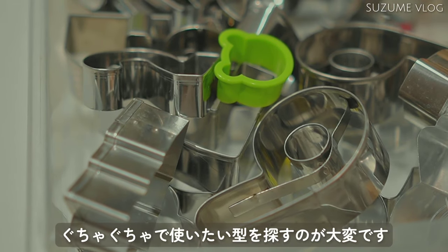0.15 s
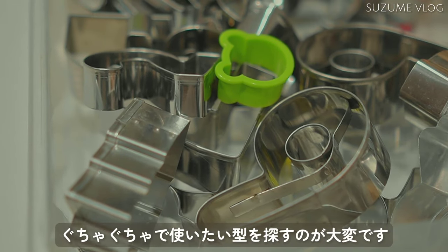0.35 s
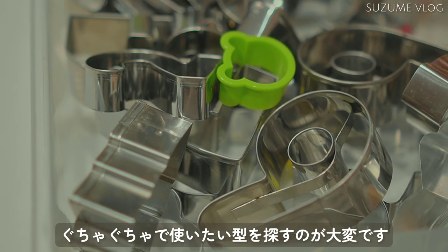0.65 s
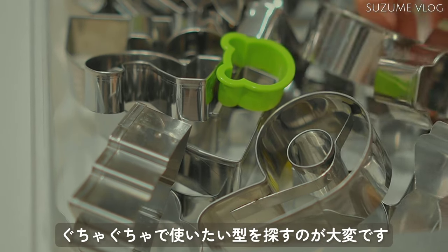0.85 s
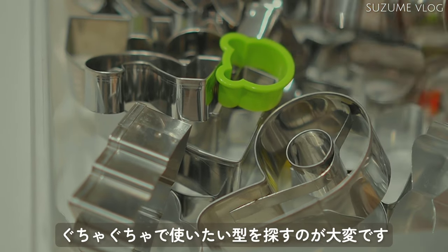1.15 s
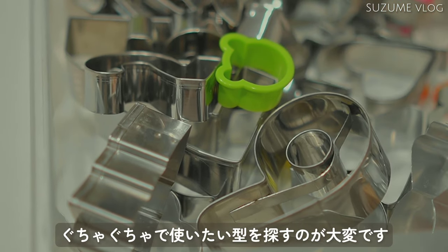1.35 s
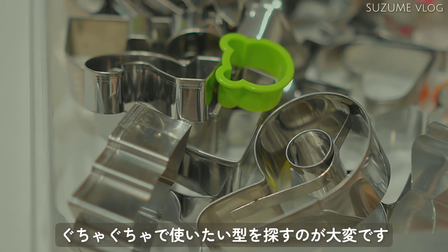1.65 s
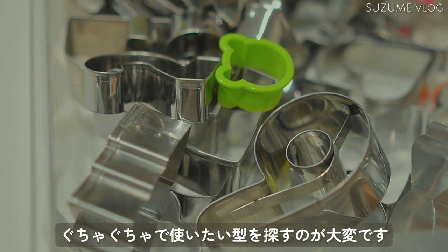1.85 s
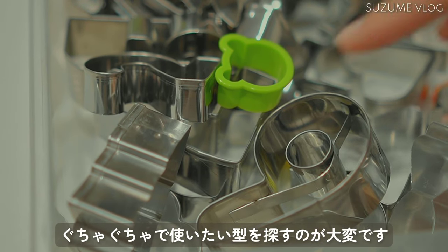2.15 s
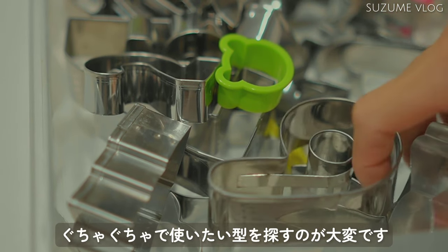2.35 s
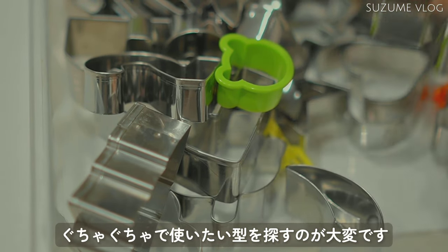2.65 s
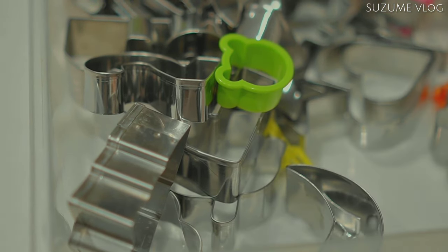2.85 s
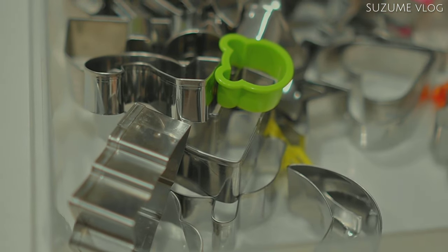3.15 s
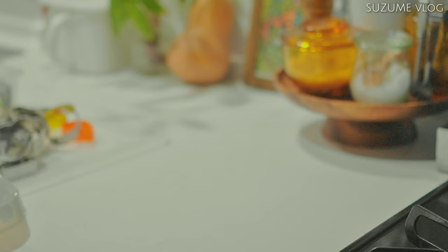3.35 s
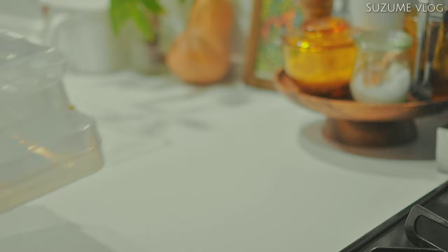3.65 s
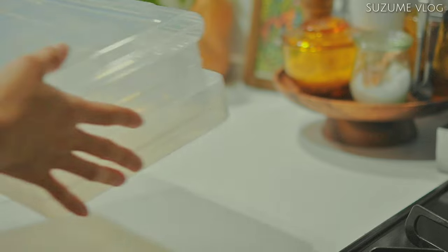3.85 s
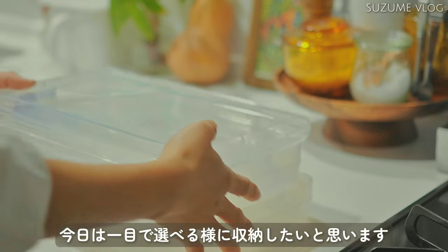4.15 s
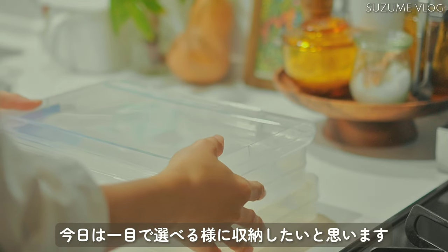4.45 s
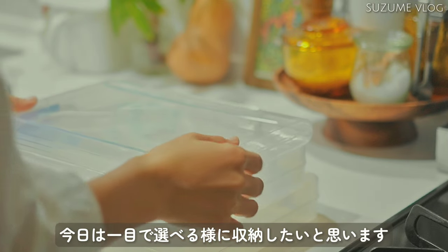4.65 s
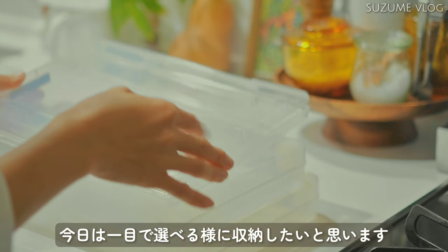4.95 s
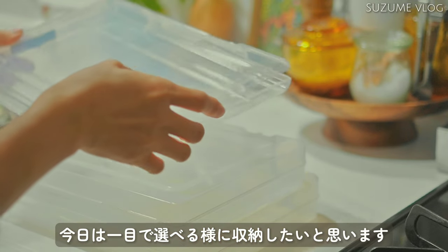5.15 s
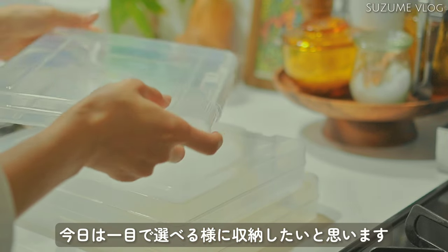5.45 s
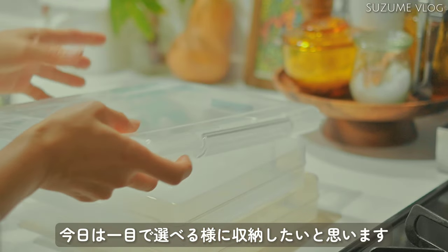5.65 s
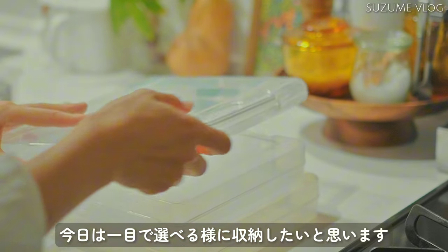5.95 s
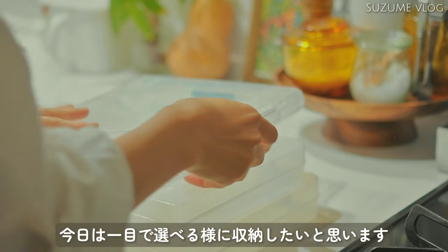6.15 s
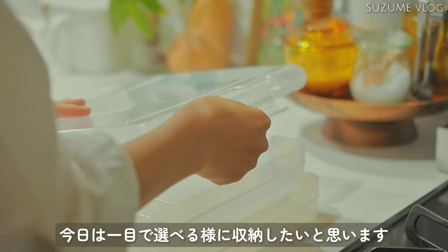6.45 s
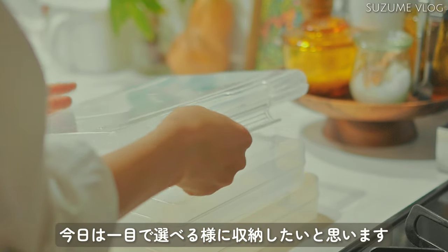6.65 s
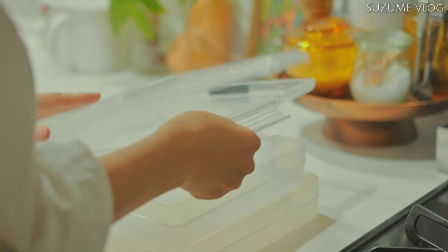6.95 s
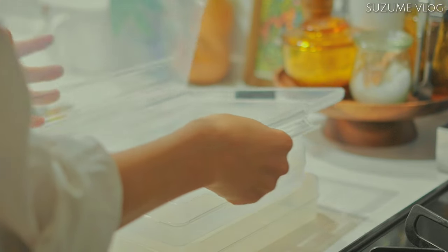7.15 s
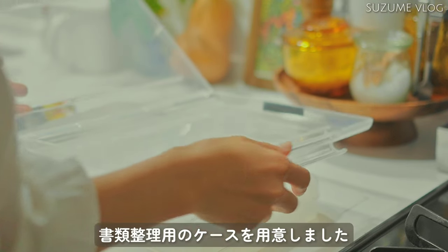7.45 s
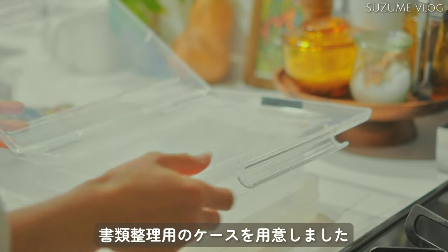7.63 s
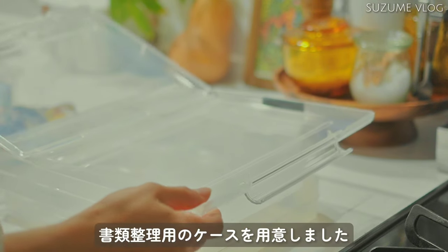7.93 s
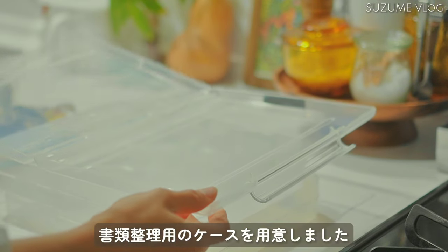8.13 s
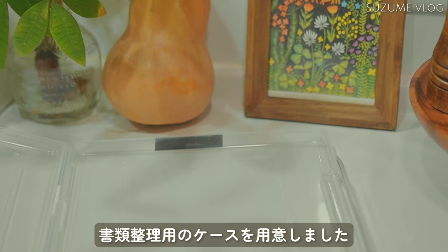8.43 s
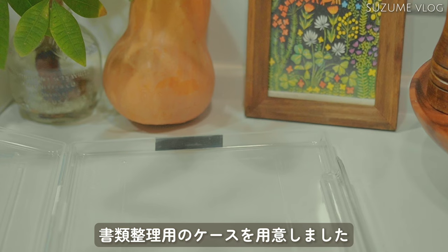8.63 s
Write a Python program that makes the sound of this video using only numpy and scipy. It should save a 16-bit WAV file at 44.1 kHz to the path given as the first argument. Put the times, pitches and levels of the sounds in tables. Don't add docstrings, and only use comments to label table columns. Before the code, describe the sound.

A hand rummages through thin metal cookie cutters in a plastic box: dense, bright clinks, sharp knocks and brief ringing, in three bursts with short lulls. Abruptly the scene changes to flat plastic cases being stacked, lifted, unlatched and opened on a kitchen counter, with dry clacks and soft scrapes. It ends on near-silent room tone. Close stereo microphone, small indoor room, little bass.

```python
import sys
import numpy as np
from scipy import signal
from scipy.fft import rfft, irfft
from scipy.io import wavfile
from scipy.ndimage import uniform_filter1d, minimum_filter1d

SR = 44100
rng = np.random.default_rng(int(sys.argv[2]) if len(sys.argv) > 2 else 0)


def store_pcm(level_fs):
    pcm = np.round(np.clip(level_fs, -1, 1) * 32767).astype(np.int16)
    wavfile.write(sys.argv[1], SR, np.atleast_2d(pcm).T)


def amplitude_ratio(level_db):
    exponent = np.asarray(level_db, float) / 20
    return 10 ** exponent


N = 387618
T = np.arange(N) / SR

CHANGES_S = [
    3.376,
    8.356,
]
HANDFULS_S = [0, .315, .708, 1.505, 2.305, 2.915, 3.38]
# frequency in Hz, level in dB.
WALL_MODES = [
    [(3908, -52)],
    [(2955, -36), (3806, -46), (5572, -21), (7289, -34), (8204, -47), (11983, -49)],
    [(1674, -27), (2433, -24.5), (5825, -28), (9652, -39), (11149, -44)],
    [(4904, -38), (5825, -39), (6842, -28.5), (8495, -54)],
    [(1540, -27), (4102, -26), (4893, -26.5), (10869, -55), (11730, -42)],
    [(5760, -38), (6794, -22), (8215, -25), (9335, -26.5), (12554, -39), (13598, -31)],
]
# frequency in Hz, density in dB per Hz.
STEEL_SPECTRUM = [(710, -35.5), (1200, -22), (1700, -4), (1860, -4.5), (2760, -4), (4620, 1.5),
                  (10400, -7.5), (12400, -6), (15600, -12), (16500, -68)]
# frequency in Hz, density in dB per Hz.
BOX_SPECTRUM = [(59, -67), (100, -39), (171, -40), (248, -55), (301, -15), (745, -9), (1430, 5.5),
                (1870, 3), (3500, -8.5), (4550, -5), (7700, -120)]
# frequency in Hz, density in dB per Hz.
CASE_SPECTRUM = [(410, -28.5), (700, -4), (884, -1), (1120, -0.5), (1720, 1.5), (2290, 2), (4420, -3.5),
                 (6000, -11.5), (7800, -24), (13200, -120)]
# frequency in Hz, density in dB per Hz.
AIR_SPECTRUM = [(15, -99), (25, -62), (197, -20.5), (280, -14.5), (339, -18), (470, -7), (1980, -3),
                (2150, -2.5), (2600, -6), (3320, -7), (5130, -11.5), (15200, -23), (16500, -23)]
AIR_DB = [
    -48,
    -48.5,
    -50,
]
# frequency in Hz, level in dB.
WHINE = [(2169, -67), (3295, -67), (6115, -78), (14804, -78)]
# frequency in Hz, T60 in seconds.
ROOM_T60 = [(150, 0.61), (600, 0.34), (2000, 0.32), (6000, 0.31), (15000, 0.25)]
# frequency in Hz, likeness from 0 to 1.
LIKENESS = [(100, 1), (1000, 0.93), (4000, 0.69), (12000, 0.013)]
# start in seconds, hold in seconds, chatter in dB, box share in dB.
PUSHES = [(0, 0.0057, -19.5, -6), (.323, 0.24, -15.5, -9), (.5, 0.054, -15, -4), (.713, 0.0039, -17, -13.5),
          (.76, 0.093, -15.5, -7.5), (.873, 0.027, -16, -9), (.93, 0.1, -15, -9.5),
          (1.09, 0.056, -17, -9.5), (1.194, 0.028, -18, -1.5), (1.32, 0.072, -27.5, -8),
          (1.525, 0.037, -25.5, -21), (1.565, 0.0052, -29, -29), (1.66, 0.016, -19.5, -26),
          (1.682, 0.11, -16.5, -7), (1.83, 0.041, -16.5, -2.5), (1.91, 0.058, -25, 6),
          (2.33, 0.019, -29, 0.5), (2.382, 0.15, -17, -14), (2.52, 0.097, -17.5, -8),
          (2.71, 0.031, -19.5, -11), (2.78, 0.064, -23, -7.5), (2.923, 0.014, -29, -23),
          (2.947, 0.025, -11.5, -9), (3.044, 0.021, -13, -37), (3.066, 0.055, -14.5, -7.5),
          (3.25, 0.062, -20, -9), (3.36, .03, -13.5, -17.5)]
# time in seconds, peak in dB, low
# ring in Hz, high ring in Hz.
KNOCKS = [(0.1382, -30, 3520, 6470), (0.246, -33, 3330, 7560), (0.321, -4.5, 5110, 7800),
          (0.389, 0, 3800, 11950), (0.4445, -6, 5060, 11600), (0.521, -2, 5650, 9100),
          (0.5596, -5, 5300, 8100), (0.7122, -4.5, 2570, 6470), (0.7606, -8, 4720, 6900),
          (0.7930, -0.5, 5280, 6900), (0.8109, 4, 4920, 11200), (0.839, -3, 4620, 8200),
          (0.8733, 6, 1500, 7540), (0.906, -4.5, 4600, 9100), (0.952, -8.5, 4070, 7340),
          (0.9643, -1.5, 4800, 6760), (1.014, -6, 4780, 10600), (1.0285, 0, 5370, 9200),
          (1.0737, -6, 5140, 7000), (1.1338, -12, 4200, 7300), (1.168, -1, 4540, 9770),
          (1.197, -13, 5940, 11600), (1.2181, -8, 1910, 9700), (1.2443, -12, 1780, 7600),
          (1.287, -12.5, 2230, 6200),
          (1.568, -18, 2490, 8200),
    (1.6142, -23.5, 5600, 9800),
    (1.6825, 0, 2240, 11800),
    (1.7014, -1, 2230, 7360),
    (1.7254, 0, 4980, 9230),
    (1.7602, -6.5, 3900, 7250),
    (1.836, -12, 3940, 8950),
    (1.891, 3, 1340, 7300),
    (1.9058, -9, 4940, 6800),
    (2.0653, -29.5, 2550, 11700),
          (2.3505, -15, 5500, 12000), (2.3753, -7.5, 4000, 6050), (2.383, -5.5, 4270, 8900),
           (2.4374, 2, 4030, 10300), (2.4854, -7, 4030, 6800), (2.537, -7, 4020, 9500),
           (2.597, -4, 4110, 9500), (2.7104, -15, 4030, 8100), (2.7198, -1, 1600, 6620),
           (2.7462, -5, 5940, 12000), (2.849, -5.5, 5270, 7100), (2.9234, -11.5, 5790, 9300),
           (2.9477, -12.5, 2330, 6560), (2.9669, 7, 5550, 6900), (2.9954, -1, 5900, 7400),
           (3.0428, 3, 6780, 13300), (3.068, 7.5, 5750, 6870), (3.0966, 3, 5800, 9500),
           (3.1486, -14, 7110, 8300), (3.2521, -9, 6440, 8360), (3.3032, -7.5, 3760, 11200),
           (3.338, -9, 5470, 8200), (3.3553, -10.5, 6500, 9200)]
# time in seconds, peak in dB.
TAPS = [(0.323, 2), (0.335, -0.5), (0.355, -9), (0.402, 7), (0.42, -3), (0.4518, -2), (0.471, -1),
        (0.5035, 2), (0.5418, -12), (0.5957, -8.5), (0.7214, -14), (0.7665, -1), (0.7784, -11),
        (0.8228, -4), (0.832, -1), (0.843, -11), (0.929, -2), (0.9745, 2.5), (1.038, -11), (1.1935, 7),
        (1.21, -4), (1.4104, -40), (1.5776, -24), (1.6672, -22), (1.8411, 4), (1.8459, 4.5), (1.875, 4.5),
        (1.9994, -13.5), (2.0695, -14), (2.356, -14.5), (2.3905, 5), (2.443, 0), (2.4507, 6.5), (2.548, -4),
        (2.5696, -8), (2.582, -12), (2.729, -20), (2.7748, -10), (2.8694, -10), (2.9277, -15), (2.955, -14),
        (3.0785, -1), (3.102, -4), (3.125, 1.5), (3.36, -5), (3.3687, -18)]
# time in seconds, peak in dB.
JOLTS = [
    (0.526, -49.5),
    (1.002, -55),
    (1.92, -55),
    (3.063, -49),
]
# start in seconds, frequency in Hz, level in dB, length in
# seconds (sign ignored, a quarter of it is held).
SINGING_PARTIALS = [(0.325, 7430, -21, 0.078), (0.341, 3790, -18, 0.037), (0.348, 11090, -30, 0.014),
                    (0.353, 12000, -20, 0.026), (0.356, 6680, -17, 0.085), (0.357, 2345, -17.5, 0.031),
                    (0.358, 4920, -13, 0.04), (0.386, 12230, -6.5, 0.037), (0.428, 6570, -18, 0.06),
                    (0.461, 7320, -16, 0.13), (0.527, 5580, -14, 0.14), (0.54, 7300, -26, 0.029),
                    (0.55, 2975, -19, 0.1), (0.556, 8500, -33, -0.00052), (0.569, 2493, -12.5, 0.0092),
                    (0.76, 13260, -27, 0.027), (0.83, 4600, -19, 0.03), (0.8733, 7750, -5, 0.004),
                    (0.515, 1240, -14.5, 0.072), (1.218, 1720, -10, 0.012), (1.241, 1495, -16, 0.011),
                    (0.907, 8830, -21, 0.015), (1.167, 13000, -24, 0.02), (1.168, 4550, -12, -0.011),
                    (1.189, 5810, -10, 0.029), (1.192, 14500, -27, -0.006), (1.194, 11080, -6, 0.019),
                    (1.709, 3850, -19, 0.027), (1.722, 8970, -15, 0.013), (1.756, 13570, -12, 0.011),
                (1.833, 10260, -13, 0.01), (1.834, 14970, -11, 0.015), (1.835, 8530, -9, 0.019),
                (1.85, 5840, -12, 0.054), (1.874, 8600, -28, 0.0038), (1.9, 14500, -24, 0.016),
                (1.903, 4950, -7, -0.00068), (1.908, 8620, -19.5, 0.077), (2.535, 10870, -21, 0.045),
                (2.536, 4101, -9, 0.028), (2.532, 9390, -16, 0.036), (2.554, 1537, -16.5, 0.0061),
                (2.622, 3900, -19, 0.01), (2.712, 3930, -9, 0.0011), (2.716, 4910, -4, -0.0018),
                (2.748, 11850, -12.5, 0.015), (2.923, 4970, -21, 0.018), (2.924, 5800, -6, 0.021),
                (2.929, 9320, -19, 0.018), (2.924, 10100, -19, 0.019), (2.925, 8420, -19, 0.026),
                (2.98, 3400, -14, 0.036), (2.993, 5760, -1, 0.014), (2.994, 1670, -27, 0.018),
                (2.987, 6980, -6, 0.016), (3.042, 8230, -23, 0.024), (3.042, 13590, -3, 0.011),
                (3.055, 5650, -18, 0.031), (3.056, 9320, -28, 0.064), (3.064, 12600, -5, 0.039),
                (3.065, 6860, -21, 0.032), (3.119, 14500, -8, 0.02), (3.147, 7110, -17, 0.023),
                    (3.3, 2317, -22, .2),
    (3.337, 5350, -14, .015),
    (3.36, 8500, -10, 0.019),
]
# start in seconds, frequency in Hz, level in dB, length in seconds (a
RINGER = [
    (2.9235, 4101, -11, .05),
    (2.95, 4101, -21, .15),
    (3.0432, 4101, -6, .06),
    (3.068, 4101, -7, .03),
    (3.097, 4101, -6, .07),
    (3.13, 4101, -19, .1),
    (3.17, 4101, -21, .32),
]
# time in seconds, depth in dB.
HUSHES = [(.793, -19), (0.874, -10), (2.7215, -13), (.965, -9), (2.4375, -6), (2.537, -3), (1.168, -1),
          (1.7244, -2), (1.891, 2), (2.9473, -15), (2.968, -7), (3.044, -8), (3.07, -4)]
# time in
# seconds, peak in dB, panel in Hz, body in dB, brightness in dB.
CASE_KNOCKS = [(3.483, -38, 2100, -20, 1), (4.132, -41, 1160, -26, 6), (4.2036, -7, 3430, -18.5, -7),
               (4.353, -26, 1550, -9, -2), (4.676, -31, 1790, -7.5, -26), (4.856, -30, 1300, -34, -31),
               (4.885, -33, 1720, -5, -24), (4.939, -19.5, 1045, -10, -8), (5.196, -41, 700, 1.5, -20),
               (5.3914, -15.5, 2360, -39, 1.5), (5.396, -12, 4540, -33, -12), (5.4605, -8, 1920, -48, -28),
               (5.473, -19.5, 1410, -22, -20), (5.647, 0, 1610, -21.5, -8.5), (5.65, -7.5, 1690, -15.5, -26),
               (5.659, -22, 1600, -24, -22), (5.805, -16.5, 1500, -20, -3), (5.811, -17, 1280, -13, -5),
               (5.85, -24, 1770, -21, -15), (5.878, -14.5, 1800, -16, -3.5), (5.972, -26.5, 1280, -26, -5),
               (5.993, -30, 1010, -20, -11), (6.018, -34, 1350, -11, -12), (6.05, -35, 845, -5, -11),
               (6.232, -38, 1590, -3, -23),
               (6.338, -27, 995, -37, 8.5), (6.399, -35, 875, -13, -26), (6.49, -20.5, 1040, -20, -7),
           (6.513, -16, 1590, -28, -5), (6.606, -24, 1800, -31, -7), (6.694, -17, 1420, -16, -12),
           (6.699, -17.5, 2160, -17, -21), (6.706, -26.5, 1400, -22, -22), (6.7596, -15.5, 3840, -14, -4.5),
           (6.827, -17.5, 1580, -23, -32), (6.899, -19.5, 1650, -39, -5.5), (6.928, -27, 760, -26, -23),
           (7.197, -36, 2830, -23, -22), (7.223, -34.5, 854, -3, -28), (7.365, -37.5, 2390, -26, -25),
           (7.605, -31.5, 1390, -13, -2), (7.673, -29, 1690, -23, -21), (7.828, -35, 3640, -19, -29),
           (7.842, -25, 1680, -36, -4), (8.057, -40, 890, -17, -22), (8.214, -26, 2800, -34, -2),
           (8.258, -39, 1410, -16, -27), (8.31, -29.5, 2460, -21, -22), (6.507, -20, 1540, -22, 3),
           (6.565, -32.5, 700, -11, -22), (6.752, -24, 1300, -27, -12), (8.155, -40, 2020, -25, -2),
           (8.33, -36, 2000, -20, -4), (5.487, -22.5, 1400, -19, -25), (5.687, -13.5, 1730, -24, -6)]
# start in seconds, hold in seconds, rub in dB, brightness in dB.
SLIDES = [(3.4, 1, -44, -10), (4.28, 0.19, -34, -14.5), (4.5, 0.13, -36, -10), (4.75, 0.056, -39, -10),
          (5.03, 0.12, -39.5, -29), (5.43, 0.05, -43, -10), (5.73, 0.019, -28.5, -23),
          (5.9, 0.14, -40, -2.5), (6.52, .02, -40, -4), (6.66, 0.13, -45, -10), (6.92, 0.036, -42, -27),
          (7.22, 0.046, -39, -11), (7.5, 0.17, -41.5, -5.5), (7.69, 0.0084, -36.5, -6),
          (7.87, 0.013, -34, -8), (8.15, 0.022, -43, 4), (8.26, 0.096, -36.5, -13)]

PUSH_RISE_DB_PER_S, PUSH_FALL_DB_PER_S = 3000, 346
SLIDE_RISE_DB_PER_S, SLIDE_FALL_DB_PER_S = 200, 152
SETTLE_DB, SETTLE_DB_PER_S = -1.5, 100
TICK_DB, CLICK_DB, THUD_DB = -10, -9, -10
TAP_TICK_DB, TAP_CRACK_DB = -4.5, -16.5
RING_T60_S, STRIKE_SPREAD_DB = 0.08, 2.5
COUNTER_HZ = 182
SING_RISE_S, SING_FALL_DB_PER_S, SING_DB, SING_WET_DB = 0.0015, 656, -4, -6
WAVER_DB = 2.5
HUSH_S = 0.002
ECHO_S, ECHO_DB = 0.017, -14
SQUEEZE_DB, RELEASE_DB_PER_S = -9, 345


def rms_one(x):
    return x / np.sqrt(np.mean(x ** 2) + 1e-20)


def at_hz(points, hz):
    table_hz, values = np.array(points).T
    return np.interp(np.log(hz), np.log(table_hz), values)


def samples(times_s):
    return (times_s * SR).astype(int)


def sides(pan_db):
    return amplitude_ratio(np.array([[pan_db], [-pan_db]]) / 2)


def colour(x, spectrum_db):
    log_gain = at_hz(spectrum_db, np.linspace(1, SR / 2, 1025)) * np.log(10) / 20
    fold = np.r_[1, 2 * np.ones(1023), 1, np.zeros(1023)]
    taps = irfft(np.exp(rfft(irfft(log_gain) * fold)))
    return signal.oaconvolve(np.atleast_2d(x), taps[None] / np.linalg.norm(taps))[:, :N]


def band(x, low_hz, high_hz):
    sos = signal.butter(2, [low_hz, min(high_hz, SR / 2.2)], "band", fs=SR, output="sos")
    return signal.sosfilt(sos, x)


def ring(clicks, hz, t60_s):
    r = amplitude_ratio(-60 / (t60_s * SR))
    w = 2 * np.pi * hz / SR
    return signal.lfilter([0, np.sin(w)], [1, -2 * r * np.cos(w), r * r], clicks + 1e-18)


def grains(per_s, spread_db, size=N):
    sizes = amplitude_ratio(spread_db * np.minimum(rng.exponential(1, size), 4)) * rng.choice([-1, 1], size)
    return rms_one(sizes * (rng.random(size) < per_s / SR))


def bursts(times_s, levels_db, t60_s):
    clicks = np.zeros(N)
    clicks[samples(times_s)] = amplitude_ratio(levels_db)
    envelope = signal.lfilter([1], [1, -amplitude_ratio(-60 / (t60_s * SR))], clicks + 1e-18)
    return envelope * rng.standard_normal(N)


def tone(level_db, hz, t60_s):
    t = np.arange(int(t60_s * SR)) / SR
    beat = 1 + 1.3 * np.cos(2 * np.pi * hz * 0.012 * t)
    return amplitude_ratio(level_db - 60 * t / t60_s) * beat * np.sin(2 * np.pi * hz * t)


def strokes(rows, rise_db_per_s, fall_db_per_s):
    start_s, hold_s, level_db, second_db = np.transpose(rows)[..., None]
    t = T[::128]
    after_s = np.maximum(t - start_s - np.abs(hold_s), 0)
    fall_db = np.maximum(-fall_db_per_s * after_s, SETTLE_DB - SETTLE_DB_PER_S * after_s)
    levels_db = level_db + fall_db - rise_db_per_s * np.maximum(start_s - t, 0)
    loudest = levels_db.argmax(0)
    return np.interp(T, t, levels_db.max(0)), np.interp(T, t, second_db[loudest, 0])


def cutters():
    stir_db, box_db = strokes(PUSHES, PUSH_RISE_DB_PER_S, PUSH_FALL_DB_PER_S)
    s, peak_db, low_hz, high_hz = np.transpose(KNOCKS)
    thud_db = THUD_DB + box_db[samples(s)]
    effort = amplitude_ratio(1.9 * (stir_db + 17.0) - 20.0)
    strikes = np.zeros(N)
    strikes[samples(s)] = amplitude_ratio(peak_db)
    walls = handful_walls(effort, strikes)
    for k in range(len(s)):
        low_t60_s = RING_T60_S * min(low_hz[k] / 4000, 1) ** 2
        for hz, level_db, t60_s in ((low_hz[k], -18.0, low_t60_s), (high_hz[k], -16.0, 0.06)):
            a, partial = int(s[k] * SR), tone(peak_db[k] + level_db, hz, t60_s)
            walls[a:a + len(partial)] += partial
    tap_s, tap_db = np.transpose(TAPS)
    every_s = np.r_[s, tap_s]
    chatter = grains(2500, spread_db=0.0) * effort
    cracks = bursts(every_s, np.r_[peak_db - 9.5, tap_db + TAP_CRACK_DB], 0.049)
    steel = colour(amplitude_ratio(-5.5) * chatter + cracks, STEEL_SPECTRUM)[0]
    thuds = bursts(s, peak_db + thud_db, 0.042)
    box = colour(chatter * amplitude_ratio(box_db - 1.0) + thuds, BOX_SPECTRUM)[0]
    box += worktop()
    loose = rattle(amplitude_ratio(-42.5) * effort, amplitude_ratio(-42.0) * strikes)
    ticks = bursts(every_s, np.r_[peak_db + TICK_DB, tap_db + TAP_TICK_DB], 0.0023)
    ticks = band(ticks + amplitude_ratio(CLICK_DB) * strikes, 1860, 18600)
    return band(walls * sides(-1.1) + loose, 1530, 24500) + (steel + ticks) * sides(-2.3) + box


def handful_walls(effort, strikes):
    walls = np.zeros(N)
    tail = SR // 2
    for start_s, end_s, modes in zip(HANDFULS_S, HANDFULS_S[1:], WALL_MODES):
        a, b = int(start_s * SR), int(end_s * SR)
        for hz, level_db in modes:
            clicks = amplitude_ratio(-36.0) * effort[a:b] * grains(180, spread_db=-18.0, size=b - a)
            clicks += strikes[a:b] * amplitude_ratio(rng.normal(6.1, STRIKE_SPREAD_DB, b - a))
            walls[a:b + tail] += amplitude_ratio(level_db + 8.0) * ring(np.r_[clicks, np.zeros(tail)], hz, 0.019)
    return walls


def rattle(effort, strikes):
    out = np.zeros((2, N))
    for start_s, end_s in zip(HANDFULS_S, HANDFULS_S[1:]):
        a, b = int(start_s * SR), int(end_s * SR)
        knocks = np.flatnonzero(strikes[a:b])
        at = rng.integers(0, b - a, (b - a) // 200)
        clinks = effort[a + at] * amplitude_ratio(3.14 * np.minimum(rng.exponential(1, len(at)), 3))
        for hz in np.geomspace(1300, 15800, 60) * rng.uniform(0.98, 1.02, 60):
            touches = np.zeros(b - a + SR // 8)
            touches[at] = clinks * rng.normal(0, 1, len(at)) ** 2 * rng.choice([-1, 1], len(at))
            touches[knocks] += strikes[a + knocks] * rng.normal(0, 1, len(knocks))
            t60_s = 0.037 * (4000 / hz) ** 0.27 * rng.uniform(0.87, 0.91)
            gain = amplitude_ratio(at_hz(STEEL_SPECTRUM, hz)) * np.sqrt(hz / 4000 / t60_s)
            rung = ring(touches, hz, t60_s) * gain
            out[:, a:a + len(rung)] += rung * sides(rng.normal(-4.1, 1.0))
    return out


def worktop():
    jolts = bursts(*np.transpose(JOLTS), 0.11)
    return band(ring(jolts, COUNTER_HZ, 0.076), 193, 600) * amplitude_ratio(-9.0)


def singing():
    out = np.zeros(N)
    brush = amplitude_ratio(WAVER_DB * rms_one(band(rng.standard_normal(N), 41, 160)))
    t = np.arange(SR // 6) / SR
    for s, hz, level_db, hold_s in SINGING_PARTIALS + RINGER:
        a = int(s * SR)
        fall_db = SING_FALL_DB_PER_S * np.maximum(t - abs(hold_s) / 4, 0) + 60 * t
        envelope = amplitude_ratio(level_db + SING_DB - fall_db) * np.minimum(t / SING_RISE_S, 1)
        out[a:][:len(t)] += envelope * np.sin(2 * np.pi * hz * (t + a / SR))
    return out * brush


def hush():
    s, depth_db = np.transpose(HUSHES)[..., None]
    t = T[:int(CHANGES_S[0] * SR)]
    return amplitude_ratio((depth_db * np.exp(-np.abs(s - t) / HUSH_S) * (t < s)).sum(0))


def cases():
    s, peak_db, panel_hz, body_db, bright_db = np.transpose(CASE_KNOCKS)
    rub_db, sheen_db = strokes(SLIDES, SLIDE_RISE_DB_PER_S, SLIDE_FALL_DB_PER_S)
    present = T > CHANGES_S[0]
    rub = grains(1200, spread_db=-1.5) * amplitude_ratio(2.03 * (rub_db + 36.5) - 45.0) * present
    body = bursts(s, peak_db + body_db + 10.5, 0.062)
    bright = bursts(s, peak_db + bright_db - 6.5, 0.052)
    out = colour(bursts(s, peak_db - 8, 0.066) + rub, CASE_SPECTRUM)[0]
    out += band(body + amplitude_ratio(6.5) * rub, 396, 1020)
    out += band(bright + amplitude_ratio(sheen_db + 6.5) * rub, 2700, 11100)
    size = SR // 10
    dying = amplitude_ratio(-60 * np.arange(size) / SR / 0.032)
    for k, a in enumerate(samples(s)):
        panel = band(dying * rng.standard_normal(size), 0.84 * panel_hz[k], 1.124 * panel_hz[k])
        out[a:a + size] += amplitude_ratio(peak_db[k] - 10.5) * rms_one(panel) / 4
    boom_db = 0.46 * peak_db + 0.3 * body_db - 27
    out += band(bursts(s, boom_db, 0.18), 168, 330)
    crackle = grains(140, spread_db=24.5) * amplitude_ratio(2.4 * (rub_db + 33.0) - 44.0) * present
    snaps = bursts(s, peak_db + 0.53 * bright_db + 2, 0.0025)
    snaps[samples(s)] += amplitude_ratio(peak_db + 10)
    lag = int(ECHO_S * SR)
    snaps[lag:] += amplitude_ratio(ECHO_DB) * snaps[:-lag]
    out += band(snaps + crackle, 780, 6000)
    return out * np.ones((2, 1))


def room_tail():
    hz = np.geomspace(100, 17000, 12)
    size = SR // 2
    tail, t = np.zeros((2, size)), np.arange(size) / SR
    for low_hz, high_hz in zip(hz, hz[1:]):
        mid, side = band(rng.standard_normal((2, size)), low_hz, high_hz)
        alike = np.clip(at_hz(LIKENESS, low_hz), 0, 1)
        pair = np.sqrt(1 + alike) * mid + np.sqrt(1 - alike) * side * [[1], [-1]]
        tail += pair * amplitude_ratio(-60 * t / at_hz(ROOM_T60, low_hz))
    tail *= np.minimum(t / 0.00019, 1)
    return tail / np.linalg.norm(tail[0])


def kitchen(x, tails, wet_db):
    out = x.copy()
    turn = np.arange(x.shape[1]) / SR / 0.02
    for k, tail in enumerate(tails):
        share = np.cos(np.pi / 3 * (turn - k)) ** 2 * np.sqrt(8 / 9)
        out += amplitude_ratio(wet_db) * signal.oaconvolve(x.mean(0)[None] * share, tail)[:, :x.shape[1]]
    return out


def room_air():
    mid, side = colour(rng.standard_normal((2, N)), AIR_SPECTRUM)
    side = amplitude_ratio(-14.0) * band(side, 2100, 26000) + amplitude_ratio(-6.5) * side
    whine = sum(amplitude_ratio(db + 4.5) * np.sin(2 * np.pi * hz * T) for hz, db in WHINE)
    rumble = amplitude_ratio(-48.0) * band(rng.standard_normal(N), 200, 410)
    air_gain = amplitude_ratio(np.array(AIR_DB)[np.searchsorted(CHANGES_S, T)])
    return air_gain * (mid + side * [[1], [-1]]) + (whine + rumble) * (T > CHANGES_S[1])


def scene():
    tails = [room_tail() for _ in range(3)]
    first_s, last_s = CHANGES_S
    cut = int(first_s * SR)
    sung = singing()[:cut] * sides(-3.5)
    steel = kitchen(cutters()[:, :cut] + amplitude_ratio(SING_WET_DB) * sung, tails, -3.0)
    steel += (1 - amplitude_ratio(SING_WET_DB)) * sung
    plastic = kitchen(cases()[:, cut:], tails, -2.5)
    near = np.c_[steel * hush(), plastic]
    near *= np.clip(np.abs(T - first_s) / 0.0061, 0, 1) * (T < last_s)
    dip = np.clip(np.maximum((last_s - T) / 0.004, (T - last_s) / 0.015), 0.1, 1)
    bass_cut = signal.butter(3, 140, "high", fs=SR, output="sos")
    return dip * (signal.sosfilt(bass_cut, near) + room_air())


def band_limit(x):
    return signal.sosfilt(signal.butter(12, 16830, fs=SR, output="sos"), x)


def record(dry):
    level_db = 10 * np.log10(uniform_filter1d((dry ** 2).mean(0), size=161) + 1e-9)
    squeeze_db = np.maximum(level_db - SQUEEZE_DB, 0)
    squeeze_db = np.maximum.accumulate(squeeze_db + RELEASE_DB_PER_S * T) - RELEASE_DB_PER_S * T
    levelled = dry * amplitude_ratio(-uniform_filter1d(squeeze_db, size=381))
    over_db = np.maximum(20 * np.log10(np.abs(levelled).max(0) + 1e-9) + 0.5, 0)
    held_db = np.maximum.accumulate(over_db + 150 * T) - 150 * T
    duck_db = uniform_filter1d(-minimum_filter1d(-held_db, size=65), size=33)
    top_cut = signal.cheby2(10, 60, 17000, fs=SR, output="sos")
    mix = signal.sosfilt(top_cut, levelled * amplitude_ratio(-duck_db))
    return band_limit(mix)


dry = scene()
out = record(dry)
store_pcm(out)
```